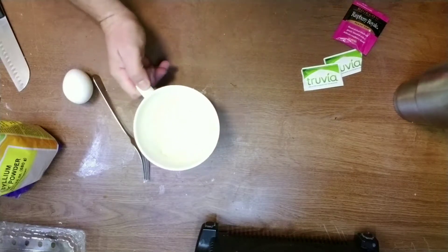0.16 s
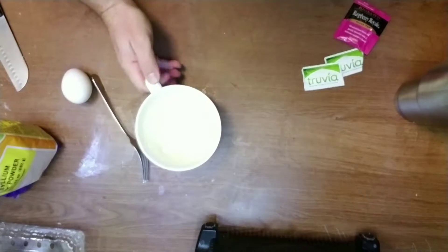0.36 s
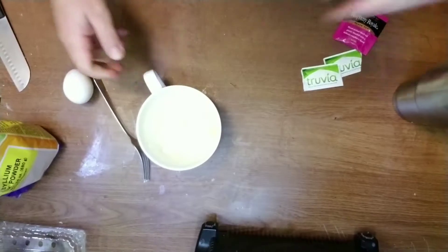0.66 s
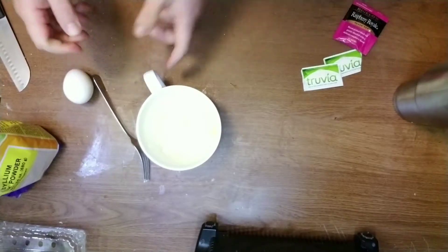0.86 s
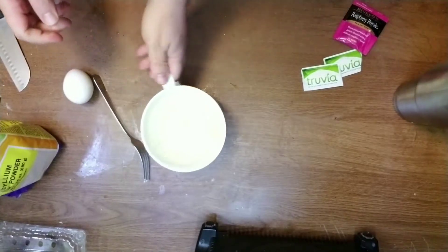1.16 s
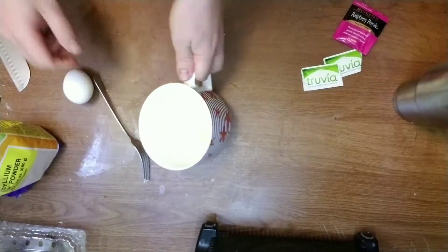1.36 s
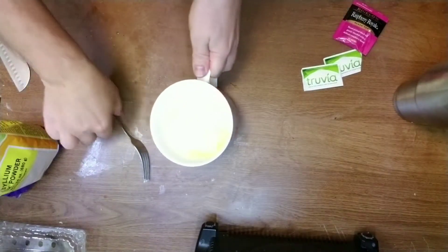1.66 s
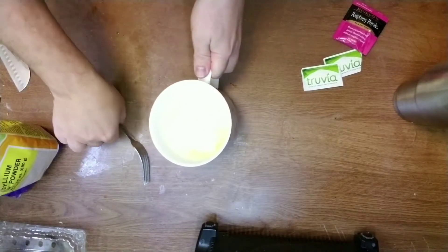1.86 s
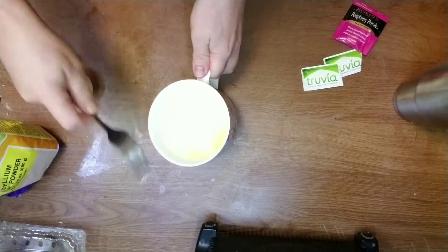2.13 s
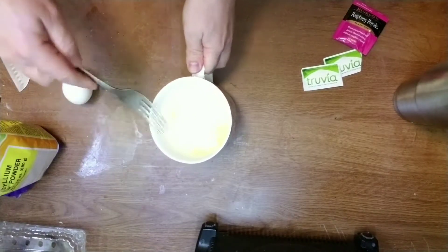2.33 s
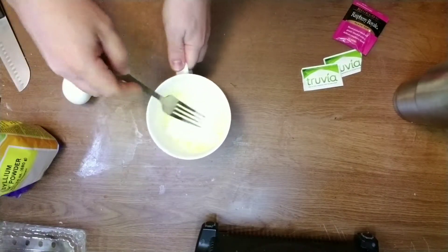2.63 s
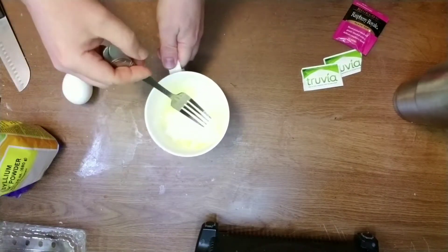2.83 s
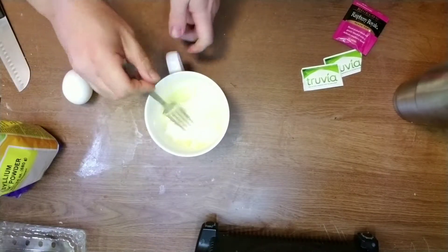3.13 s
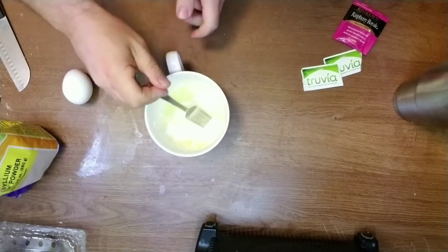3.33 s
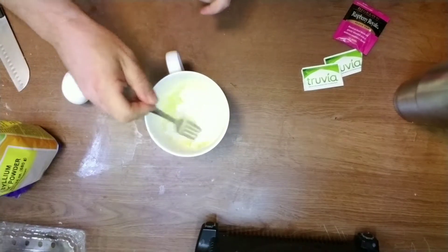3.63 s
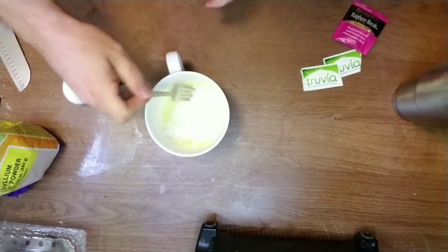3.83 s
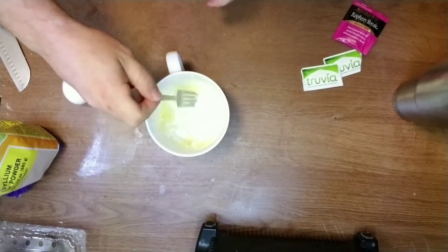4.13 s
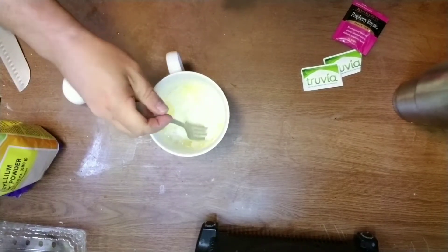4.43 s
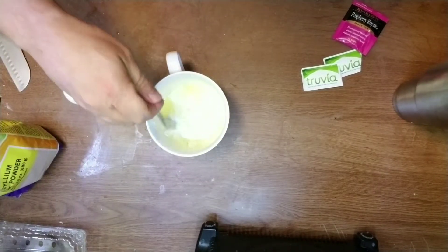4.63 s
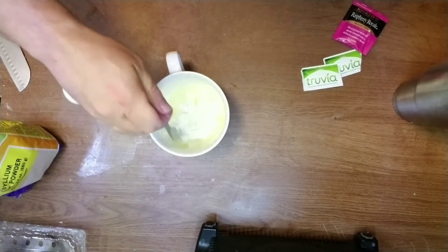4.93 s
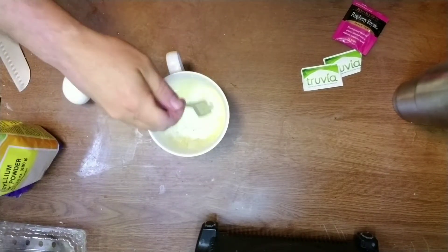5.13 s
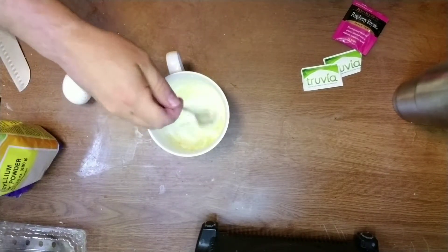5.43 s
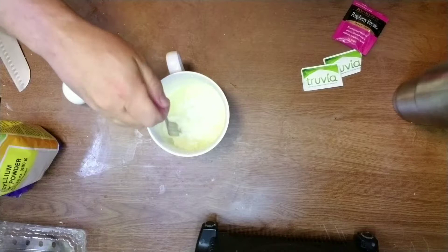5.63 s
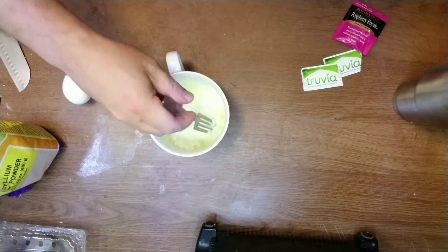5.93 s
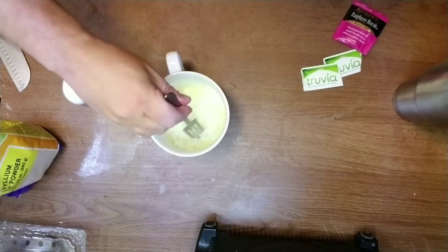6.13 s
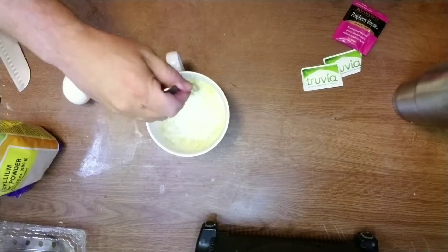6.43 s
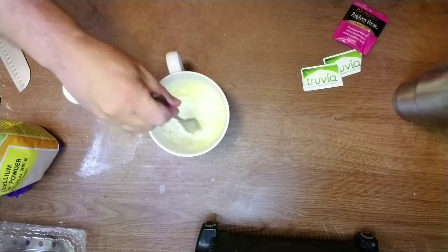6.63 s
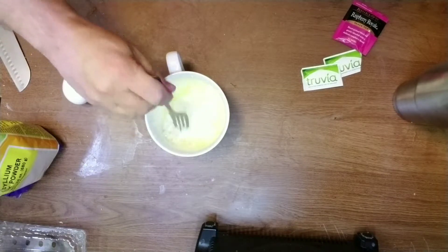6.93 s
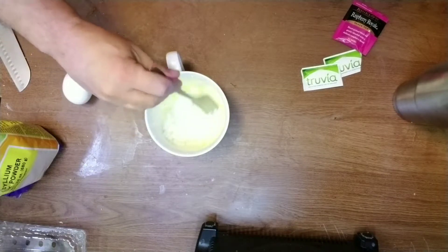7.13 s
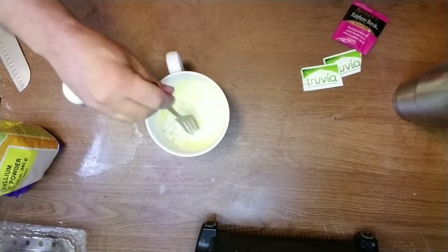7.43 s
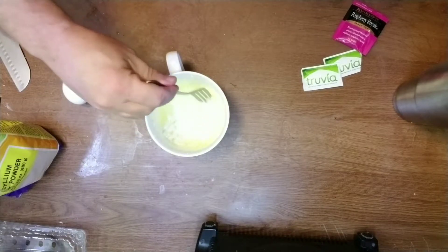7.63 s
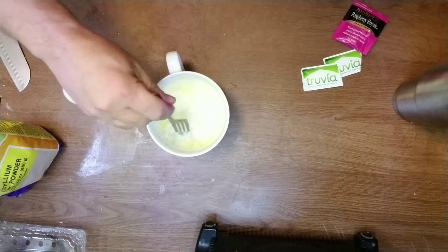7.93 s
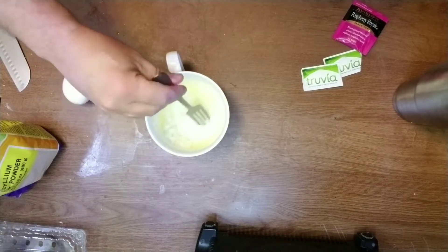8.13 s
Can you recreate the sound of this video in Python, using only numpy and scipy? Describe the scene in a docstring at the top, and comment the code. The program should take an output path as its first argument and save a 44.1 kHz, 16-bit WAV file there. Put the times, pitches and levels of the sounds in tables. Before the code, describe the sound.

A ceramic mug knocks and slides on a wooden table, then a steel fork ticks, scrapes and squeaks while stirring inside it.

```python
"""A mug knocks and slides on a wooden table; then a steel fork ticks, scrapes and squeaks in soft food. Twice
the fork strikes the wall and the mug rings. A small kitchen rumbles and hums behind, over a faint hiss. Table,
mug and tines are sums of fading sine waves; the table also has a burst of noise. Rubbing is noise shaped by the
fork's resonances, squeaks are wavering tones, and a short echo adds the room."""
import sys
import numpy as np
from scipy import signal
from scipy.fft import rfft, irfft, next_fast_len
from scipy.io import wavfile
from scipy.ndimage import uniform_filter1d, map_coordinates

SR = 44100
rng = np.random.default_rng(int(sys.argv[2]) if len(sys.argv) > 2 else 0)


def file_out(sig):
    """Save sig as 16-bit WAV at sys.argv[1]."""
    # one column per channel
    cols = np.atleast_2d(sig).T
    # limit, then scale
    lim = np.clip(cols, -1, 1)
    pcm = np.round(lim * 32767).astype(np.int16)
    wavfile.write(sys.argv[1], SR, pcm)


N = 364707
T = np.arange(N) / SR  # seconds since the start
AGE = T[:SR]  # seconds since one event began

# the mug's ringing modes, split into pairs by its handle:
# (frequency [Hz], relative level [dB], time to fade by 60 dB [s], left-right level [dB], left-right phase [rad])
MUG_MODES = [(1550, -11, .6, 4, .7), (1668, 0, .52, -5, 1.3), (3958, -10, .17, 3, 2.1),
             (4091, 0, .33, -5, 1.4), (4151, -5, .12, -5, 1.4), (5396, -1, .25, 2, 1),
             (7003, -22, .22, 0, 1), (7569, -3, .25, 5, 1), (7800, -5, .18, 2, 1), (8700, -22, .2, 0, 1),
             (9895, -20, .16, 0, 1), (11795, -16, .15, 0, 1), (12230, -19, .17, 0, 1),
             (13190, -24, .2, 0, 1)]
# resonances of the hand-held fork on glaze: (frequency [Hz], width [Hz], relative level [dB])
FORK_RESONANCES = [(2080, 74, -4.5), (4120, 830, -34.5), (4550, 250, -16.5), (4985, 170, 3),
                   (5620, 70, 7.5), (6750, 170, -1.5), (7130, 180, -4.5), (7880, 140, 1), (8530, 160, 3),
                   (9700, 240, 3), (10570, 260, 2), (11190, 170, 3.5), (12060, 140, 17), (12800, 620, 8),
                   (14100, 2100, 2.5)]
# the force of steel on glaze: (frequency [Hz], relative level [dB])
GLAZE_FORCE = [(1000, 2.5), (2100, 8.5), (2550, -9), (3400, -16), (4100, -1), (15000, -11)]


def knocks():
    """The mug's foot lands, rocks and settles on the table; its wall rings faintly."""
    # the foot strikes the table: (time [s], level [dB], contact brightness [Hz])
    landings = [(0.14, -4, 1340), (0.18, -12.5, 1200), (.327, -18.5, 645), (.345, -17.5, 650),
                (2.7714, -12.5, 560), (5.137, -10, 422)]
    out = np.zeros((2, N))
    for s, db, bright_hz in landings:
        # a softer contact wakes less of the high ringing
        wall = mug(lambda hz: -25 - 50 * np.log10(1 + (hz / bright_hz) ** 2 / 2), held=.05)
        add(out, s, amp(db) * (thump(bright_hz) + wall))
    return out


def thump(bright_hz):
    """The table's answer to a blow; a soft contact leaves out the high modes, and little deep bass radiates."""
    # the table top's modes: (frequency [Hz], relative level [dB], time to fade by 60 dB [s])
    table_modes = [(99, -16.5, .22), (160.4, -25, 0.28), (206, -2.5, 0.1), (253.7, -8.5, 0.088),
                   (279.7, -10.5, 0.13), (360.2, -9, 0.18), (493, -9.5, 0.059), (615.6, -11.5, 0.15),
                   (807, -11.5, 0.022), (845, -5.5, 0.051), (925, -15, 0.045), (1344, -15.5, 0.091),
                   (1435, -16.5, 0.11), (1757, -10.5, .05), (2143, -29, .06), (2860, -22.5, .06)]
    # its dense rattle: (frequency [Hz], relative level [dB])
    rattle_spectrum = [(30, -24.5), (80, -38), (170, -20.5), (400, 1), (900, -3), (1200, -9), (1900, -7),
                       (3000, -18.5), (6000, -23.5), (15000, -35.5)]
    rattle = rush(rattle_spectrum, size=SR) * fade(.12) * (1 - fade(.02))
    wood = amp(-6) * ring(table_modes) + amp(-9) * rattle
    soft = signal.butter(2, np.clip(bright_hz, 200, SR / 3), fs=SR, output="sos")
    radiated = signal.butter(2, 130, "highpass", fs=SR, output="sos")
    return panned(signal.sosfilt(np.vstack([soft, radiated]), wood), pan_db=-1.5)


def mug(level_db, held):
    """The wall rings with level_db(Hz); after held seconds the high modes are choked."""
    out = np.zeros((2, SR))
    choke = amp(-350 * np.maximum(AGE - held, 0))  # 350 dB a second
    for hz, db, t60, pan_db, turn in MUG_MODES:
        waves = np.sin(2 * np.pi * hz * AGE + np.array([[turn], [-turn]]) / 2)
        mode = panned(waves, pan_db) * amp(db + level_db(hz)) * fade(t60)
        is_high = hz > 2 * MUG_MODES[0][0]
        out += mode * (choke if is_high else 1)
    flutter = amp(0.54 * wobble(50, size=SR))
    return out * flutter * (1 - fade(.015))


def low_pair(levels_db, rise):
    """The mug's two lowest modes swell for rise seconds, then ring out."""
    out = np.zeros((2, SR))
    for db, (hz, _, t60, pan_db, turn) in zip(levels_db, MUG_MODES):
        decay = np.exp(-np.log(1000) * np.maximum(AGE - rise, 0) / t60)
        swell = np.minimum(AGE / rise, 1) * decay
        phase = 2 * np.pi * (hz * AGE + rng.random()) + np.array([[turn], [-turn]]) / 2
        out += panned(amp(db) * swell * np.sin(phase), pan_db / 2)  # half of the table's left-right level
    return out


def taps():
    """Blows of the fork: ticks and table thumps, and apart from them the ringing of mug and tines."""
    # the tines touch the table once, then keep meeting the mug's bottom:
    # (time [s], tick level [dB], table thump level [dB])
    touches = [(1.899, -54.5, -57), (3.212, -66, -59), (3.772, -38.5, -26), (3.907, -42.5, -46),
               (4.26, -46.5, -54), (4.329, -44, -33), (4.475, -44.5, -35), (4.533, -45.5, -62),
               (5.1361, -31.5, -30), (5.877, -40.5, -40.5), (6.003, -44, -27), (6.215, -44, -29.5),
               (6.489, -50, -41), (6.502, -42, -60), (6.751, -60, -54), (6.927, -55, -38.5),
               (7.136, -49, -32), (7.187, -44.5, -44), (8.110, -50, -48)]
    # the fork strikes the wall: (time [s], level of the second tick [dB], table thump level [dB],
    # lowest pair [dB], main 4 kHz mode [dB], its neighbours [dB], higher modes [dB], time until choked [s])
    strikes = [(4.6333, -33, -30, -22.5, -11, -18, -37, 0.1),
               (7.2943, -31, -37.5, -15.5, -28, -8, -24, 0.15)]
    # the tines' modes: (frequency [Hz], relative level [dB], time to fade by 60 dB [s])
    tine_modes = [(2040, -7, .08), (2800, -12, .05), (5400, -8, .15), (5652, 0, .18), (11260, -17, .08),
                  (11780, -2, .08), (12590, -13, .12), (13690, -20, .2)]
    # the push on the table also wakes the mug's two lowest modes: (lower [dB], upper [dB]) against the thump
    below_thump_db = (-34, -28.5)
    hard_tick_db, hard_ring_db = -31, -26.5  # a hard tick and the tines' ring after it
    growth = 3  # dB of ring per dB of tick

    blows, ringing = np.zeros((2, 2, N))
    for s, tick_db, thump_db in touches:
        add(blows, s, amp(tick_db) * tick())
        add(blows, s, amp(thump_db) * thump(bright_hz=764))
        tine_db = hard_ring_db + growth * (tick_db - hard_tick_db)
        add(ringing, s, amp(tine_db) * ring(tine_modes) * (1 - fade(0.021)))
        add(ringing, s, amp(thump_db) * low_pair(below_thump_db, rise=0.02))
    for s, tick_db, thump_db, low_db, main_db, near_db, high_db, held in strikes:
        crack_db = -0.5  # against the thump
        add(blows, s, amp(thump_db) * (thump(bright_hz=2500) + amp(crack_db) * crack()))
        add(blows, s, amp(tick_db + 6.5) * tick())
        add(blows, s + 0.0042, amp(tick_db) * tick())  # the next tine lands
        # the spot that is struck decides which modes answer
        shares = [(1668, low_db), (3958, near_db), (4091, main_db), (4151, near_db), (5396, high_db)]
        add(ringing, s + 0.0012, mug(lambda hz: along(shares, hz), held))
    return blows, ringing


def tick():
    """Steel meets glaze: a sharp crack and a short chatter of the tines."""
    envelope = (fade(0.0067) + amp(-3) * fade(0.028))[:SR // 4]
    burst = rng.standard_normal((2, SR // 4)) * envelope
    direct = filtered(burst, lambda hz: amp(along(GLAZE_FORCE, hz)))
    sound = steel(burst, FORK_RESONANCES, scatter_db=1.5, shift=0.018) + amp(-7.5) * direct
    return sound / np.std(sound[:, :SR // 200])  # the first 5 ms set the level


def crack():
    """A hard blow on the stiff wall starts with a short, dry crack."""
    # the wall's first answer: (frequency [Hz], width [Hz], relative level [dB])
    wall_resonances = [(2240, 350, -1), (2820, 260, -2), (6640, 710, -7), (10560, 500, -2)]
    sound = resonate(rng.standard_normal((2, SR)) * fade(0.027), wall_resonances)
    return sound / np.std(sound[:, :SR // 200])  # the first 5 ms set the level


def stirring():
    """Strokes rub the tines over the glaze with steadily changing pressure and end in a swell of grinding."""
    # the tines drag over the bottom and grind as they near the wall:
    # (start [s], length [s], rub level [dB], growth of the rub [dB], grind level [dB])
    drags = [(3.254, 0.22, -55.5, 5, -78), (3.534, 0.19, -66.5, 0, -88), (3.91, 0.16, -52, 13, -62),
             (4.269, 0.2, -60, 5, -64), (4.575, 0.048, -48.5, 23, -73), (4.673, 0.19, -51, 6.5, -52.5),
             (4.931, 0.04, -49, 13.5, -63), (5.028, 0.072, -55, 6, -48), (5.204, 0.17, -53, -2.5, -57),
             (5.587, .14, -61, -6.5, -65), (5.749, 0.032, -73, 0, -54.5), (6.209, 0.12, -55.5, -6, -75),
             (6.349, 0.079, -54, 13.5, -68), (6.487, 0.1, -51.5, -11, -46), (6.754, 0.061, -54, 8.5, -68),
             (6.925, 0.035, -51, -12, -63), (7.188, 0.17, -52, 3, -77), (7.489, 0.28, -56.5, 4, -60),
             (7.782, 0.13, -62, 3, -49.5), (7.999, 0.52, -56.5, 6.5, -71.5)]
    # tines pressed hard: (frequency [Hz], width [Hz], relative level [dB])
    pressed_resonances = [(4100, 170, -7.5), (4630, 170, 2.5), (5840, 200, -5.5), (7100, 250, -18)]
    attack_s, release_db_per_s = .024, 290  # the tines bite, then leave the glaze
    grind_s = .1  # longest grinding at the end of a stroke
    catch_db, patchy_db = 3.5, 5  # how unevenly a tine catches, how much its colour shifts

    out, t = np.zeros((2, N)), AGE[:SR // 2]
    for start, length, rub_db, growth_db, grind_db in drags:
        progress = np.minimum(t / length, 1)
        envelope = gesture(length, attack_s, release_db_per_s)[:len(t)]
        pressure = amp(rub_db + growth_db * (progress - .5)) * envelope
        # two tines catch and let go, each with its own colour
        tines = 0
        for _ in range(2):
            catching = amp(catch_db * np.tanh(wobble(50, size=len(t))))
            slips = friction(rate=700, spread_db=4, smooth=.7)
            tines = tines + catching * steel(slips, FORK_RESONANCES, scatter_db=3, shift=.02)
        add(out, start, pressure * unit(patchy(tines, patchy_db)))

        pressed = min(grind_s, length)
        swell = np.sin(np.pi * np.minimum(t / pressed, 1))
        rough = resonate(friction(rate=900, spread_db=3, smooth=.7), [(4550, 1500, 0)])
        chatter = steel(rough, pressed_resonances, scatter_db=2.5, shift=.01)
        add(out, start + length - pressed, amp(grind_db) * swell * unit(chatter))
    return out


def friction(rate, spread_db, smooth):
    """Half a second of tiny slips of uneven size, about rate a second, over a smooth rub."""
    chance = rng.random(SR // 2)
    sizes, *noise = rng.standard_normal((5, SR // 2))
    slips = (chance < rate / SR) * amp(spread_db * np.clip(sizes, -2, 2))
    return unit(unit(slips * noise[:2]) + smooth * np.array(noise[2:]))


def steel(x, peaks, scatter_db, shift):
    """Friction through the fork, whose resonances change a little with each grip and angle."""
    moved = []
    for hz, width, db in peaks:
        moved.append((hz * (1 + shift * rng.normal()), width, db + scatter_db * rng.normal()))
    return filtered(resonate(x, moved), lambda hz: amp(along(GLAZE_FORCE, hz)))


def patchy(x, depth_db):
    """Narrow resonances come and go as the contact point moves."""
    z = signal.stft(x, nperseg=512)[2]
    # random gains, smoothed over frequency and then over time
    field = uniform_filter1d(rng.standard_normal(z.shape[1:]), size=3, axis=0)
    field = uniform_filter1d(field, size=8, axis=1)
    return signal.istft(z * amp(depth_db * unit(field)), nperseg=512)[1][:, :x.shape[-1]]


def singing():
    """Rubbed near a node (still point) of one mode, the wall swells in the other."""
    # a tine brushes the wall: (time [s], rise [s], lower mode level [dB], upper mode level [dB])
    brushes = [(3.412, 0.066, -65, -55), (3.781, .05, -55, -43), (4.416, 0.089, -49.5, -53.5),
               (5.211, 0.013, -57, -51), (6.145, 0.03, -63, -53.5), (6.496, 0.021, -42, -67),
               (6.928, .02, -64.5, -79.5), (7.16, .04, -50.5, -51.5), (7.59, 0.031, -53.5, -47),
               (8.079, 0.057, -49, -49)]
    out = np.zeros((2, N))
    for s, rise, *levels_db in brushes:
        add(out, s, low_pair(levels_db, rise))
    return out


def squeaks():
    """A tine sticking and slipping fast on the glaze gives a wavering whistle with its octave; some of these
    tones are the tines ringing near 5.65 kHz."""
    # (time [s], length [s], level [dB], pitch [Hz], octave against the pitch [dB])
    whistles = [(4.947, 0.071, -54, 5810, -17), (5.279, 0.11, -55.5, 5652, -17.5),
                (5.607, .13, -62.5, 5650, -20), (7.508, .029, -53.5, 6050, 0.5),
                (8.117, 0.04, -43, 6026, 12.5), (8.213, 0.051, -47.5, 5990, 9)]
    out = np.zeros((2, N))
    for s, length, db, hz, octave_db in whistles:
        wavering_hz = hz * (1 + 0.0041 * wobble(224, size=SR))
        phase = 2 * np.pi * np.cumsum(wavering_hz) / SR
        swell = np.sin(np.pi * np.minimum(AGE / length, 1))
        tone = np.sin(phase) + amp(octave_db) * np.sin(2 * phase)
        add(out, s, panned(amp(db) * swell * tone, pan_db=3))
    return out


def handling():
    """The mug gathers speed, judders over the wood and stops; fingers and fork rustle lightly."""
    # the mug is pushed over the wood: (time of the fastest moment [s], run-up [s], level [dB])
    pushes = [(.04, 0.36, -44.5), (.25, 0.1, -42), (0.339, 0.052, -35), (1.403, 0.16, -32)]
    # fingers at the handle, the fork sliding off the table, then sinking into the food:
    # (start [s], length [s], level [dB])
    light_touches = [(0.756, 0.22, -65), (1.808, 0.064, -61), (1.892, 0.023, -49.5), (2.598, 0.29, -62.5),
                     (3.262, 0.23, -56)]
    # sound of the sliding foot: (frequency [Hz], relative level [dB])
    foot_spectrum = [(35, -63), (70, -19), (130, -14), (195, 4), (300, -9.5), (380, -5), (480, -21),
                     (1500, -29.5), (3000, -37), (5000, -57.5), (10000, -68)]
    # sound of the rustles: (frequency [Hz], relative level [dB])
    rustle_spectrum = [(300, 7), (900, 3), (2000, 1), (3200, -8), (4000, -12.5), (5500, -16.5), (8000, -19),
                       (15000, -15)]
    run_up_db, stop_db_per_s = 24.5, 174  # gain over the run-up, then the foot comes to rest

    speed = 0
    for s, run_up, db in pushes:
        before = run_up_db * np.maximum(s - T, 0) / run_up
        after = stop_db_per_s * np.maximum(T - s, 0)
        speed = speed + amp(db - before - after)
    touch = np.zeros((1, N))
    for s, length, db in light_touches:
        add(touch, s, amp(db) * gesture(length, attack=0.0087, release_db_per_s=181))
    drag = speed * unit(rush(foot_spectrum) * amp(0.67 * wobble(46)))
    rustle = touch * unit(rush(rustle_spectrum) * amp(2.9 * wobble(90)))
    return panned(drag + rustle, pan_db=-1.0)


def kitchen():
    """Ventilation rumble (noise) and an appliance's unsteady hum (sine waves), over a smooth hiss."""
    # rumble colour: (frequency [Hz], relative level [dB])
    rumble_spectrum = [(15, -57), (25, -35.5), (43, -8), (127, -6.5), (199, -0.5), (275, -14), (358, -12),
                       (610, -22), (679, -18.5), (1360, -30), (2080, -43), (2640, -44), (5560, -50.5),
                       (11700, -45.5), (14500, -50.5)]
    # the rumble dips briefly: (time [s], level [dB])
    rumble_level = [(0, -45), (.25, -47.5), (.75, -57.5), (1.3, -50), (2.2, -48), (8.27, -49)]
    # hum tones before the 2.5 dB cut and the wobble: (frequency [Hz], level [dB])
    hum_tones = [(48.4, -60), (199.2, -69), (366.1, -59)]
    # hiss colour, with a faint narrow band near 2 kHz: (frequency [Hz], relative level [dB])
    hiss_spectrum = [(1000, -22.5), (1900, -20.5), (2080, 6), (2300, -11.5), (6000, -9.5), (9500, -7),
                     (12000, 1), (14500, -4.5)]
    # the hiss over time: (time [s], level [dB])
    hiss_level = [(0, -69.5), (3, -65), (5.5, -79.5), (8.27, -79.5)]

    hum = 0
    for hz, db in hum_tones:
        strength = amp(db - 2.5 + 1.7 * wobble(5.5))
        hum = hum + strength * np.sin(2 * np.pi * hz * T + 0.57 * wobble(3))
    level = gain_curve(rumble_level)
    low_sounds = level * rush(rumble_spectrum) + unit(level) * hum  # the hum dips with the rumble
    return panned(low_sounds, pan_db=-0.85) + gain_curve(hiss_level) * rush(hiss_spectrum)


def walls(x):
    """The small room's answer: a noise tail in which each frequency dies at its own speed."""
    # (frequency [Hz], time to fade by 60 dB [s])
    room_decay = [(150, 0.28), (1000, 0.28), (4000, 0.35), (14000, 0.19)]
    hz, t, z = signal.stft(rng.standard_normal((2, SR // 2)), SR, nperseg=256)
    decay = np.exp(-np.log(1000) * t / along(room_decay, hz)[:, None])
    tail = signal.istft(z * decay, SR, nperseg=256)[1]
    tail = np.pad(tail, ((0, 0), (SR // 200, 0)))  # the echo starts 5 ms late
    return signal.fftconvolve(x, tail / np.linalg.norm(tail[0]), axes=1)[:, :N]


def rush(spectrum, size=N):
    """Coloured stereo noise of rms 1, whose left-right likeness changes with frequency."""
    # (frequency [Hz], left-right likeness [-1 to 1])
    likeness = [(60, 0.64), (180, 0.99), (550, 0.38), (1650, -0.095), (4970, 0.042), (15000, 0.051)]

    def mid_and_side(hz):
        turn = np.arccos(np.clip(along(likeness, hz), -1, 1)) / 2
        return amp(along(spectrum, hz)) * [np.cos(turn), np.sin(turn)]

    mid, side = filtered(rng.standard_normal((2, size)), mid_and_side)
    return unit(np.array([mid + side, mid - side]))


def ring(modes):
    """Damped modes, at slightly new strengths for each blow."""
    out = 0
    for hz, db, t60 in modes:
        out = out + amp(db + rng.normal()) * fade(t60) * np.sin(2 * np.pi * hz * AGE)
    return out


def resonate(x, peaks):
    """x through resonances given as (frequency [Hz], width [Hz], level [dB])."""
    def response(f):
        return sum(amp(db) * 1j * f * w / (c * c - f * f + 1j * f * w) for c, w, db in peaks)

    return filtered(x, response)


def filtered(x, response):
    """x times a complex response of frequency."""
    size = next_fast_len(x.shape[-1] + SR // 10)
    spectrum = rfft(x, size) * response(np.fft.rfftfreq(size, 1 / SR))
    return irfft(spectrum, size)[..., :x.shape[-1]]


def gesture(length, attack, release_db_per_s):
    """One second of envelope: a quick attack, a hold until length seconds, a steady release."""
    return (1 - fade(attack)) * amp(-abs(release_db_per_s) * np.maximum(AGE - length, 0))


def fade(t60):
    """A decay of 60 dB in t60 seconds."""
    return np.exp(-np.log(1000) * AGE / t60)


def wobble(rate, size=N):
    """A smooth random curve, with rate random points a second."""
    points = rng.standard_normal(int(size * rate / SR) + 4)
    return map_coordinates(points, [T[:size] * rate])


def gain_curve(rows):
    """A gain per sample from (time [s], level [dB]) rows."""
    return amp(np.interp(T, *np.transpose(rows)))


def along(points, hz):
    """Values read between (frequency [Hz], value) points on a log axis."""
    f, v = np.transpose(points)
    return np.interp(np.log(hz + 1), np.log(f + 1), v)


def amp(db):
    """Decibels to gain."""
    return 10 ** (np.asarray(db) / 20)


def unit(x):
    """Scaled to rms 1."""
    return x / np.sqrt(np.mean(x ** 2) + 1e-20)


def panned(x, pan_db):
    """Louder on the left than on the right by pan_db."""
    return x * amp([[pan_db / 2], [-pan_db / 2]])


def add(track, s, sound):
    """Mix a sound in at time s."""
    part = track[:, max(round(s * SR), 0):][:, :sound.shape[-1]]
    part += sound[..., :part.shape[1]]


def scene():
    """Mug, fork and table with their echo in the room, over the kitchen."""
    blows, ringing = taps()
    table, whistle, scrape = knocks(), squeaks(), stirring()
    ringing = ringing + singing()
    # each sound reaches the walls with its own strength
    to_walls = amp(-17.0) * table + amp(-1.5) * blows + amp(-18.0) * ringing
    to_walls = to_walls + amp(-5) * whistle + amp(-7.5) * scrape
    return table + blows + ringing + whistle + scrape + walls(to_walls) + handling() + kitchen()


def record(dry):
    """A very steep filter removes the treble above its band limit."""
    top_hz = 14700
    return filtered(dry, lambda hz: 1 / np.sqrt(1 + (hz / top_hz) ** 240))


dry = scene()
out = record(dry)
file_out(out)
```